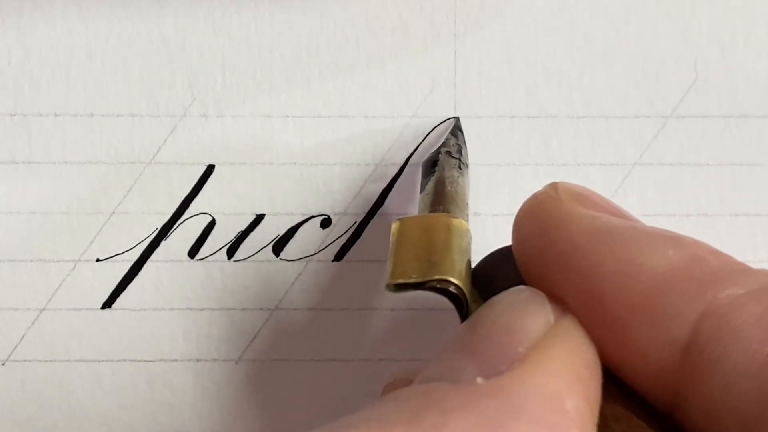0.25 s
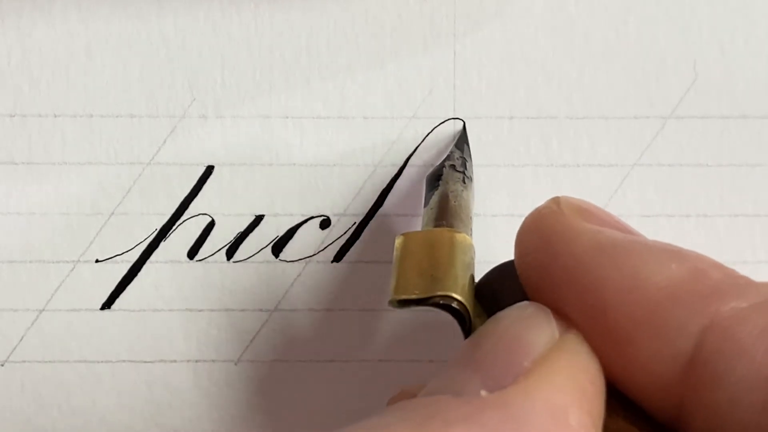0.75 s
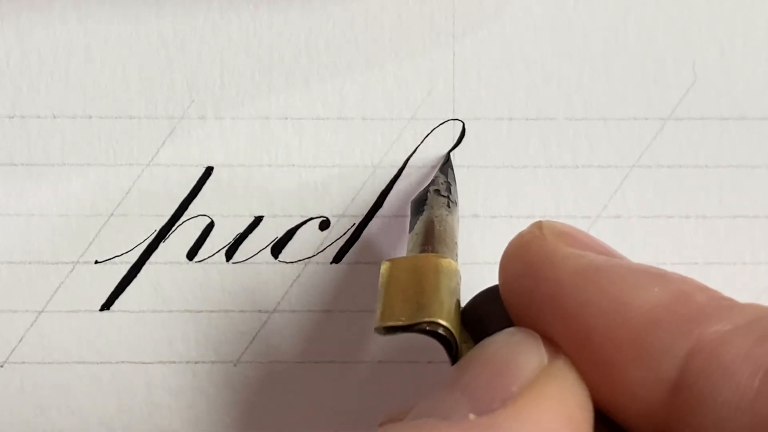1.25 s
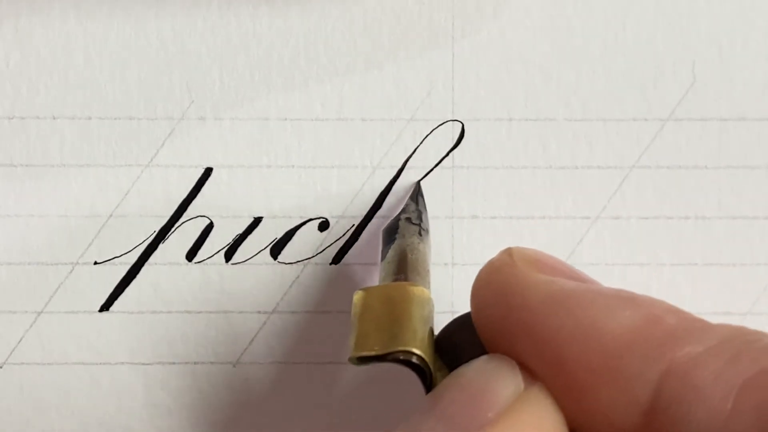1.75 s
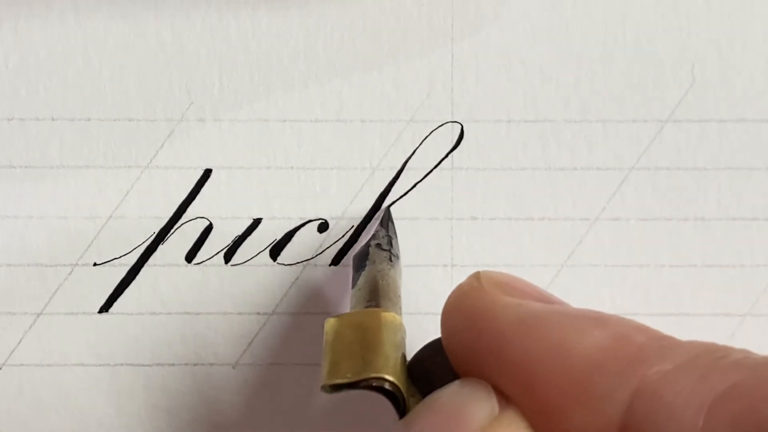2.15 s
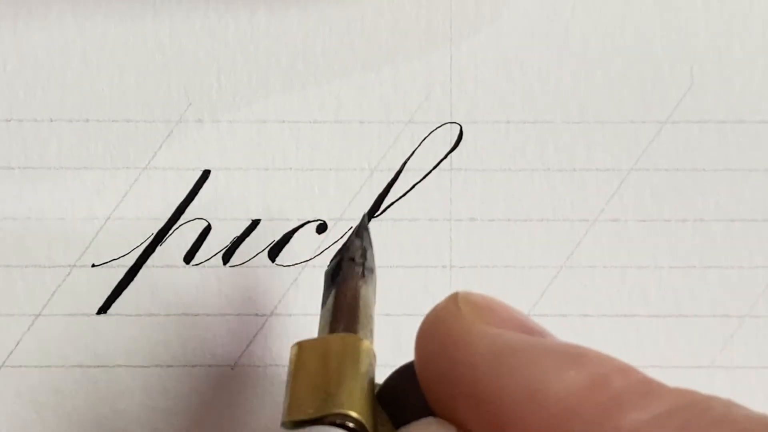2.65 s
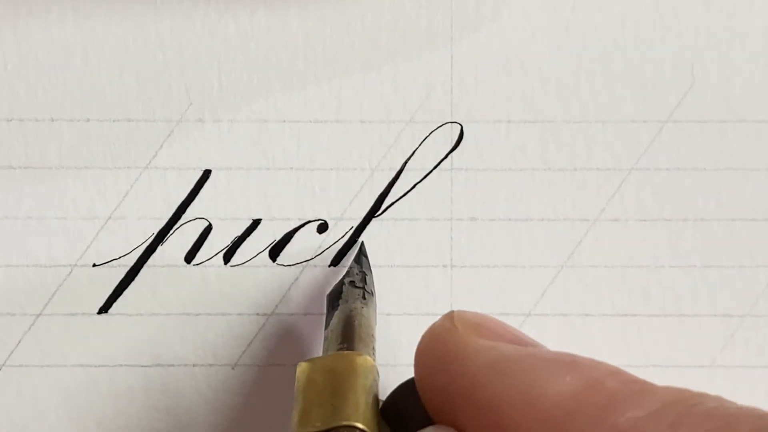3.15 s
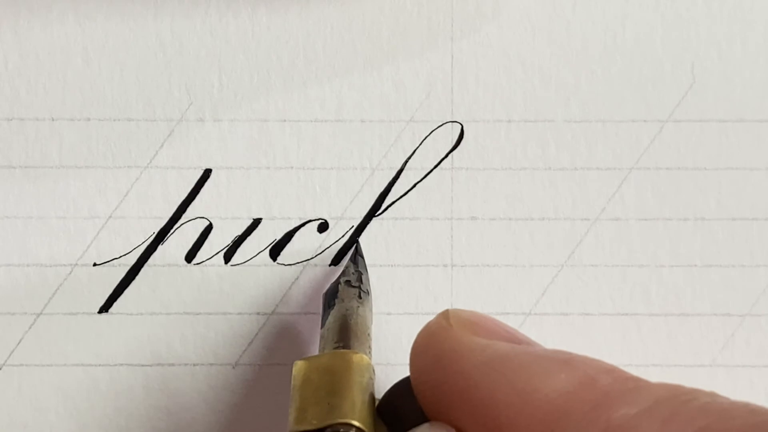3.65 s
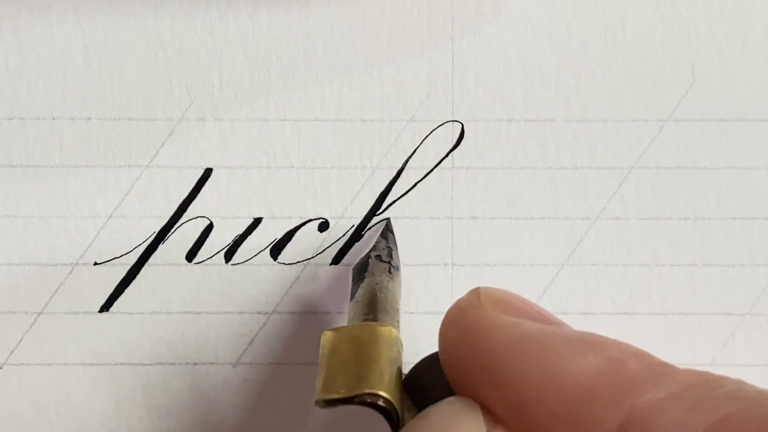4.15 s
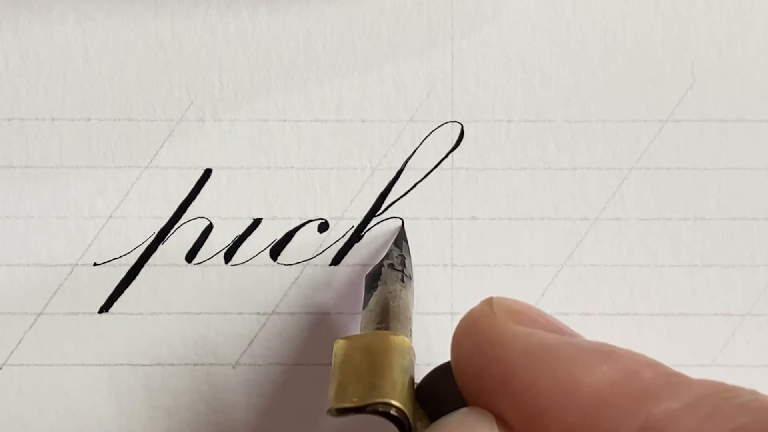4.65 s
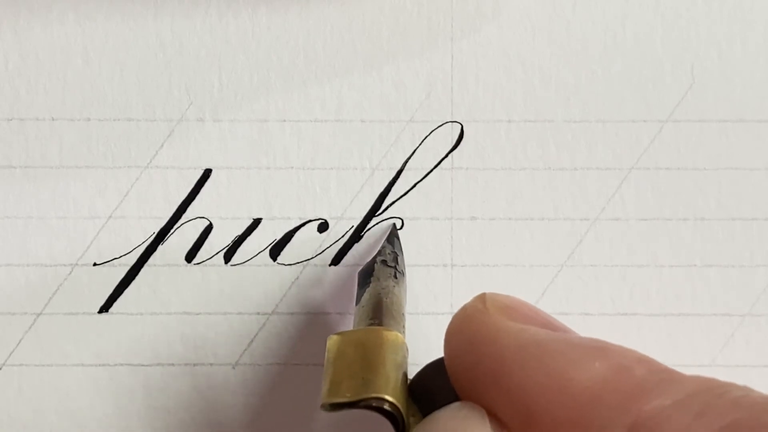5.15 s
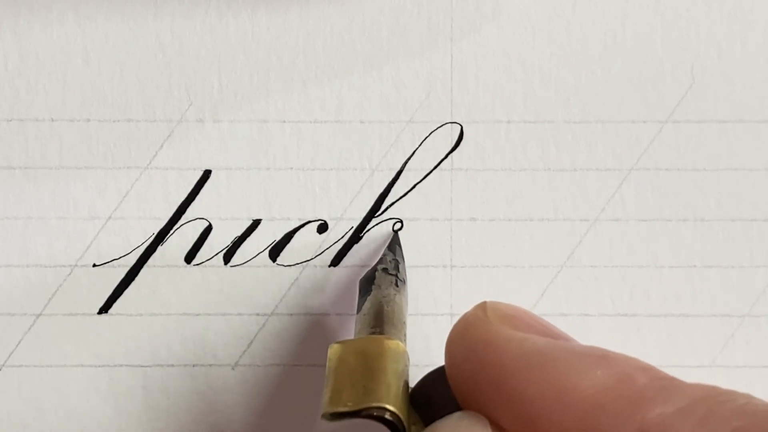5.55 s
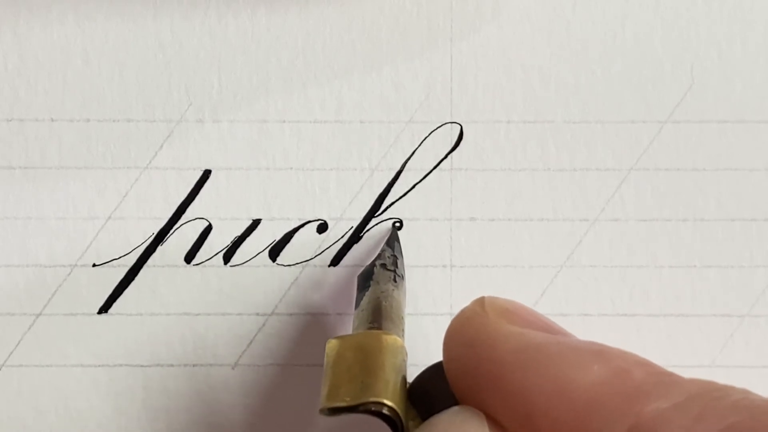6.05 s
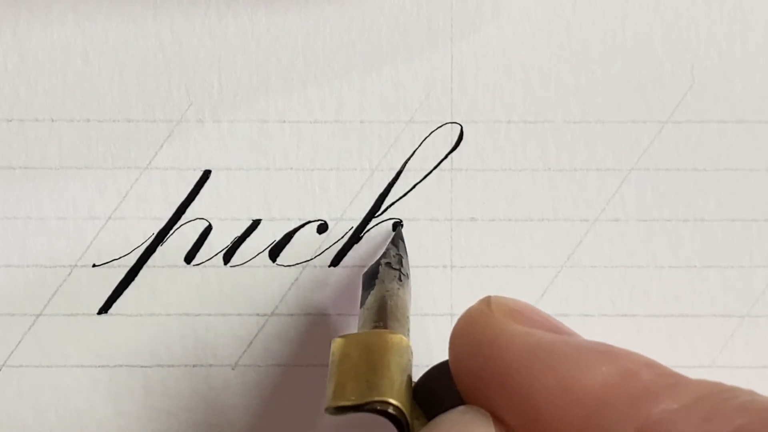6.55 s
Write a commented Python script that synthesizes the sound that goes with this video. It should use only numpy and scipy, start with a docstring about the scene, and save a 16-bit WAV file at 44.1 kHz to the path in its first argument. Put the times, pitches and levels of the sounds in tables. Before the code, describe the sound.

A steel pen nib scratches across paper with a fine rasp and bright ticks, over a low room hum.

```python
"""A low ventilation rumble and mains hum fill a small room; then, up close, a steel pen nib scratches paper.
Its tines slip from fibre to fibre in a fine rasp, and now and then catch and spring free with a bright tick.
Between strokes the hand swishes over the page and the sheet taps the desk.
The desk sways with a soft, deep throb as the hand settles."""
import sys
import numpy as np
from scipy import signal
from scipy.fft import rfft, irfft, next_fast_len
from scipy.io import wavfile

SR = 44100
rng = np.random.default_rng(int(sys.argv[2]) if len(sys.argv) > 2 else 0)


def put_to_file(sound):
    """Save the sound as 16-bit audio at rate SR, in the file named by the first command-line argument."""
    columns = np.atleast_2d(sound).T  # one column per channel
    safe = np.clip(columns, -1, 1)
    whole_steps = np.round(safe * 32767)
    wavfile.write(sys.argv[1], SR, whole_steps.astype(np.int16))


N = 299873
TIME = np.arange(N) / SR
AGE = TIME[:2048]   # seconds since a contact
FIRM_DB = -57.0   # reference ring level: the firmer a release is above it, the harder and louder the paper snaps

# a tine catches hard and springs free, levels before trim: time_s, ring_db, treble_db, snap_db
TINE_CATCHES = [(0.762, -50, 2, -51.5), (0.8685, -50.5, 5, -52), (0.9754, -50, 12, -50.5),
                (1.0732, -53, 12, -50), (1.093, -37, 5.5, -46.5), (1.112, -52, 9, -46),
                (1.1202, -34.5, 10, -51), (1.1384, -39, 10, -45.5), (1.2042, -37.5, 5, -45),
                (1.216, -50, 10, -43), (1.25, -48, 8, -48), (1.3925, -34, 11, -41.5),
                (1.4142, -36.5, 11, -41.5), (1.4851, -62, 13, -49), (1.5209, -38, 7, -50.5),
                (1.5427, -43.5, -5, -48), (1.5606, -40.5, 2, -45), (1.5966, -47, 3, -48),
                (1.6499, -49.5, 7, -47.5), (1.6647, -53, 8, -45.5), (1.6781, -55, 12, -46.5),
                (1.703, -39, 4, -47), (1.7546, -53, 6, -50.5), (1.7735, -48.5, 7, -45.5),
                (1.7906, -40, 8, -45.5), (1.7993, -52, 13, -44), (1.8142, -52, 13, -45),
                (1.8251, -44.5, 8.5, -49), (1.8448, -39.5, 9, -45.5), (1.899, -50, 11, -49.5),
                (1.9598, -43.5, 6, -50), (1.9662, -44, 8, -50.5), (2.0157, -40.5, 1.5, -44),
                (2.0532, -36.5, 10.5, -42), (2.0978, -55, 10, -50.5), (2.1075, -38.5, 7.5, -50),
                (2.1453, -44.5, 1, -45.5), (2.1937, -47, -4, -48), (2.213, -45, -10, -49),
                (2.24, -43.5, 10, -49), (3.7568, -59, 5, -50), (4.051, -63, 9, -58), (4.2165, -67, 12, -60),
                (4.7117, -52, 16, -48), (4.7475, -44.5, -1, -48.5), (4.8248, -43, 7, -48),
                (4.893, -56, 3, -60), (5.4331, -50, 10, -49), (5.4525, -46, 6, -47), (5.951, -39, 8, -46),
                (5.9813, -50, 8, -53.5), (6.3088, -59, -3, -50), (6.314, -43, 4, -46.5),
                (6.5677, -56, 6, -56)]
# the nib travels over the grain, level before trim: start_s, end_s, slips_per_s, ring_db
PEN_STROKES = [(0.76, 0.99, 16, -71), (1.075, 1.295, 36, -61), (1.427, 1.61, 26, -63),
               (1.619, 1.965, 52, -60), (2.02, 2.256, 28, -62), (3.82, 4.22, 10, -78),
               (4.697, 4.88, 12, -67), (5.39, 5.43, 25, -68), (5.93, 6.0, 28, -67)]
# tone of a snapping paper fibre: frequency_hz, gain_db
FIBRE_EQ = [(300, -6), (750, -1.5), (1250, 1.5), (1600, 1.3), (1820, -6.5), (2020, 2), (2550, 1),
            (3050, -11), (4700, -14), (5500, -11), (11000, -19), (16000, -8)]


def from_db(db):
    """Decibels to gain."""
    return 10 ** (np.asarray(db) / 20)


def decay(age, t60):
    """Envelope that loses 60 dB in t60 seconds."""
    return np.exp(-np.log(1000) * age / t60)


def colour(x, eq):
    """Shape x by (frequency_hz, gain_db) points with a causal, minimum-phase filter."""
    size = next_fast_len(2 * len(x))
    hz, db = np.transpose(eq)
    grid_hz = np.maximum(np.fft.rfftfreq(size, 1 / SR), 1)
    gain = from_db(np.interp(np.log(grid_hz), np.log(hz), db))
    cepstrum = irfft(np.log(gain), size)
    cepstrum[1:size // 2] *= 2
    cepstrum[size // 2 + 1:] = 0
    return irfft(rfft(x, size) * np.exp(rfft(cepstrum)), size)[:len(x)]


def unit_hit(x):
    """Scale a short sound to the energy of 4 ms at rms 1."""
    return x / np.sqrt(np.sum(x ** 2) / (.004 * SR))


def add(track, start_s, sound):
    """Mix a sound into the track."""
    start = round(start_s * SR)
    track[start:start + len(sound)] += sound[:N - start]


def room_tone():
    """A steady bed of ventilation rumble and hiss, with the hum of a mains appliance."""
    # rumble with its duct resonances: frequency_hz, density_db (full scale, per Hz)
    rumble_eq = [(10, -63), (38, -64), (60, -70.5), (80, -79.5), (190, -81), (270, -84.5), (315, -90),
                 (415, -85.7), (530, -89.5), (600, -93), (690, -95.5), (770, -95.5), (980, -96),
                 (2500, -112)]
    # even hiss above it: frequency_hz, density_db (full scale, per Hz)
    hiss_eq = [(500, -110), (1500, -103), (3500, -108), (9200, -112.5), (9850, -110.5), (10600, -112.5),
               (15500, -113.5), (17000, -119)]
    # mains hum: pitch_hz, rms_db
    hum_partials = [(119.95, -53.5), (239.9, -63)]
    air = sum(colour(rng.standard_normal(N + SR), eq)[SR:] for eq in (rumble_eq, hiss_eq))
    hum = sum(from_db(db) * np.sin(2 * np.pi * (hz * TIME + rng.random())) for hz, db in hum_partials)
    return air * np.sqrt(SR / 2) + hum * np.sqrt(2)


def desk_sway():
    """The hand settles and the desk sways: a few slow cycles travel up the microphone stand."""
    # deep throbs: centre_s, peak_db, pitch_hz, half_length_s
    sways = [(0.2, -38.5, 30, 0.044), (1.48, -41, 31, 0.066), (2.686, -31, 20.6, 0.08)]
    out = np.zeros(N)
    for centre_s, peak_db, hz, half_length_s in sways:
        offset_s = TIME - centre_s
        swell = from_db(peak_db) * np.exp(-(offset_s / half_length_s) ** 2)
        out += swell * np.sin(2 * np.pi * hz * offset_s)
    return out


def friction(eq, grain_db):
    """Gritty noise at rms 1: every sample has its own random strength."""
    grit = colour(rng.standard_normal(N) * from_db(grain_db * rng.standard_normal(N)), eq)
    return grit / grit.std()


def nib_drag(trim_db=-8.0, fade_s=.02):
    """The tip grinds over the finest grain of the sheet, louder as it presses harder."""
    pressure = np.zeros(N)
    for start_s, end_s, _, ring_db in PEN_STROKES:
        inside_s = np.minimum(TIME - start_s, end_s - TIME)
        pressure += from_db(ring_db) * np.clip(inside_s / fade_s, 0, 1)
    return from_db(trim_db) * pressure * friction(FIBRE_EQ, grain_db=6.0)


def fibre_snap(hard_db, crumble_db=-2.0, t60=0.017, crumble_s_per_db=.0004):
    """One clean crack, then nearby fibres crumble; a harder snap is brighter and crumbles for longer."""
    crumble = rng.standard_normal(len(AGE)) * decay(AGE, t60 + crumble_s_per_db * hard_db)
    force = (AGE == 0) + from_db(crumble_db) * crumble / np.linalg.norm(crumble)
    hz, db = np.transpose(FIBRE_EQ)
    tilt_db = .08 * hard_db * np.log2(np.clip(hz, 900, 2300))   # tilts up between 900 and 2300 Hz
    return unit_hit(colour(force, np.transpose([hz, db + tilt_db])))


def nib_ring(treble_db, scatter_db=1.4, detune=0.005, rise_s=0.00012, treble_trim_db=-0.4):
    """Each release rings the steel modes in its own mix; a sharp one favours the highest."""
    # modes of the steel nib in its holder: pitch_hz, relative_db, t60_s
    nib_modes = [(4230, -26, 0.0086), (5150, -21, 0.01), (6150, -12.5, 0.0097), (6650, -7.5, 0.01),
                 (7150, -2.5, 0.01), (7380, -4, 0.0087), (8580, -8, 0.0081), (9300, -15, 0.008),
                 (9980, -15, 0.012), (12000, -8.5, 0.007), (12700, -5, 0.0055), (13400, -1.5, 0.0055),
                 (14680, 2.5, 0.008), (15450, -4, 0.0045)]
    hz, db, t60 = np.transpose(nib_modes)[:, :, None]
    strength, bend, phase = rng.standard_normal((3, len(nib_modes), 1))
    # the load on the tip pulls each mode slightly off its pitch
    waves = np.sin(2 * np.pi * (hz * (1 + detune * bend) * AGE + phase))
    attack = 1 - np.exp(-(AGE / rise_s) ** 2)
    modes = from_db(db + scatter_db * strength) * attack * decay(AGE, t60) * waves
    high = hz[:, 0] > 11000
    body = unit_hit(modes[~high].sum(axis=0))
    sparkle = unit_hit(modes[high].sum(axis=0))
    return body + from_db(treble_db + treble_trim_db) * sparkle


def nib_swing(pressed, hz=3460, free_t60=0.05):
    """The whole nib swings back in its lowest, longest mode; pressed into the page it is damped sooner."""
    t60 = free_t60 * (.55 if pressed else 1)
    return decay(AGE, t60) * np.sin(2 * np.pi * hz * AGE)


def pen_ticks(releases, snap_trim_db=-0.6, ring_trim_db=-3.4, swing_trim_db=-5.4, lead_s=.0003):
    """Stick and slip: the paper gives way, then the tine rings."""
    out = np.zeros(N)
    for time_s, ring_db, treble_db, snap_db in releases:
        hard_db = max(ring_db - FIRM_DB, 0)
        add(out, time_s - lead_s, from_db(snap_db + snap_trim_db) * fibre_snap(hard_db))
        add(out, time_s, from_db(ring_db + ring_trim_db) * nib_ring(treble_db))
        force_db = (ring_db + snap_db) / 2   # the swing follows the overall force let go
        pressed = 0.7 < time_s < 2.3   # the long downstroke
        add(out, time_s, from_db(force_db + swing_trim_db) * nib_swing(pressed))
    return out


def small_slips(stick_s=.012, spread_db=2.2, treble_spread_db=3.0):
    """The rasp, as rows like TINE_CATCHES: along a stroke the tip meets unevenly spaced fibres."""
    slips = []
    for start_s, end_s, slips_per_s, level_db in PEN_STROKES:
        count = max(1, round((end_s - start_s) * slips_per_s))
        times = start_s + (end_s - start_s) * (np.arange(count) + rng.random(count)) / count
        for time_s, (strength, sharpness) in zip(times, rng.standard_normal((count, 2))):
            if any(0 < catch[0] - time_s < stick_s for catch in TINE_CATCHES):
                continue   # the tine is held just before a catch lets go
            ring_db = level_db + spread_db * strength
            treble_db = 7.5 + treble_spread_db * sharpness
            snap_db = -51.0 + .65 * (ring_db - FIRM_DB)   # a firmer slip snaps the paper louder
            slips.append((time_s, ring_db, treble_db, snap_db))
    return slips


def hand_slide():
    """Countless tiny contacts of skin and paper merge into a soft swish."""
    # swell of the sliding hand: time_s, level_db
    swell = [(2.365, -92), (2.385, -56), (2.41, -53.5), (2.443, -46.5), (2.462, -60), (2.482, -54),
             (2.5, -85)]
    # tone of skin on paper: frequency_hz, gain_db
    skin_eq = [(60, 15), (170, 32.5), (380, 10.5), (650, 21), (1100, 9), (1700, 6), (4200, -5), (5500, 5),
               (9000, 1), (12500, 9.5), (14700, 9), (16000, 2)]
    times, db = np.transpose(swell)
    return friction(skin_eq, grain_db=5.0) * np.interp(TIME, times, from_db(db), left=0, right=0)


def sheet_taps(body_trim_db=-2.0, click_trim_db=-2.5):
    """The sheet meets the desk with a click and a brief hollow ring."""
    # the sheet is pressed down, levels before trim: time_s, body_db, pitch_hz, t60_s, click_db
    taps = [(2.4197, -43.3, 920, 0.018, -58), (2.4864, -34.7, 955, 0.021, -35.5),
            (3.827, -46, 1480, .007, -55), (3.8694, -56.5, 1480, .006, -57),
            (4.051, -43.5, 1490, .007, -53), (4.2165, -52, 1520, 0.0072, -58)]
    # modes of the sheet: pitch_ratio, relative_db, t60_ratio
    sheet_modes = [(.705, 2.5, 2.3), (1, 8.5, 1), (1.38, -5, 1), (2.15, -19, .8), (2.95, -25, .7)]
    # tone of paper clicking on the desk: frequency_hz, gain_db
    click_eq = [(60, 10), (200, 20), (400, 11), (1500, 10), (2900, 6), (4600, -3), (5600, -3), (9000, 1),
                (12500, 6), (14700, 7), (16000, -3)]
    out = np.zeros(N)
    pitch_ratio, db, t60_ratio = np.transpose(sheet_modes)[:, :, None]
    signs = (-1) ** np.arange(len(sheet_modes))[:, None]   # neighbouring modes move in opposition
    click = unit_hit(colour(1.0 * (AGE == 0), click_eq))
    for time_s, body_db, hz, t60, click_db in taps:
        waves = np.sin(2 * np.pi * hz * pitch_ratio * AGE)
        modes = signs * from_db(db) * decay(AGE, t60 * t60_ratio) * waves
        add(out, time_s, from_db(body_db + body_trim_db) * unit_hit(modes.sum(axis=0)))
        add(out, time_s, from_db(click_db + click_trim_db) * click)
    return out


def reflections(near_db=-15.5, near_t60=0.062, room_db=-18.0, room_t60=0.14, predelay_s=0.0049):
    """Impulse response: hand and desk scatter the sound, and the room adds a faint tail."""
    age = TIME[:SR // 2]
    response = 0
    for db, t60 in ((near_db, near_t60), (room_db, room_t60)):
        tail = rng.standard_normal(len(age)) * decay(age, t60) * (age > predelay_s)
        response = response + from_db(db) * tail / np.linalg.norm(tail)
    return colour(response, [(7000, 0), (14000, -2.5)])   # the surfaces soak up some treble


def scene():
    """Pen, page and hand on the desk, in the humming room."""
    bed, response = room_tone(), reflections()
    writing = sheet_taps() + hand_slide() + nib_drag()
    writing += pen_ticks(TINE_CATCHES) + pen_ticks(small_slips())
    reverb = signal.fftconvolve(writing, response)[:N]
    return (writing + reverb + desk_sway() + bed)[None]


def record(dry, stopband_hz=17300):
    """A steep low-pass cuts off the very top."""
    return signal.sosfilt(signal.cheby2(14, 70, stopband_hz, fs=SR, output="sos"), dry)


dry = scene()
out = record(dry)
put_to_file(out)
```